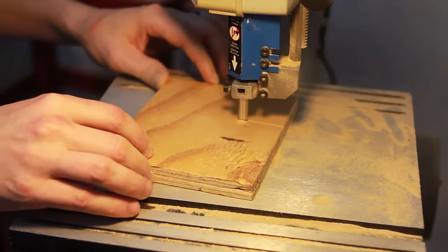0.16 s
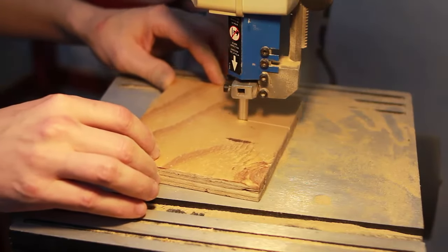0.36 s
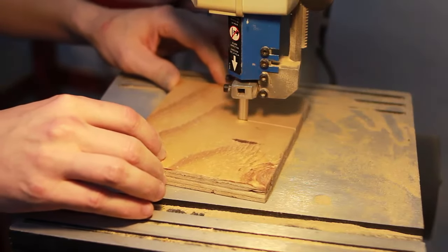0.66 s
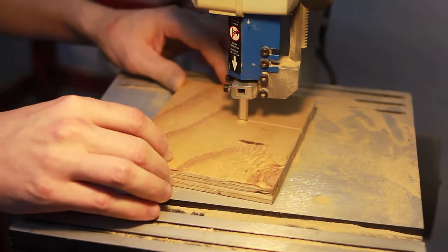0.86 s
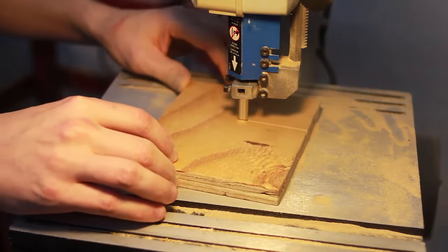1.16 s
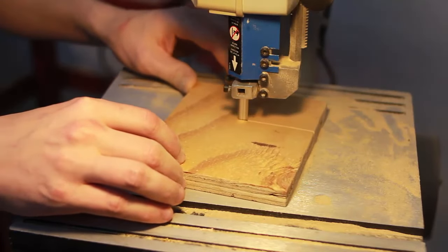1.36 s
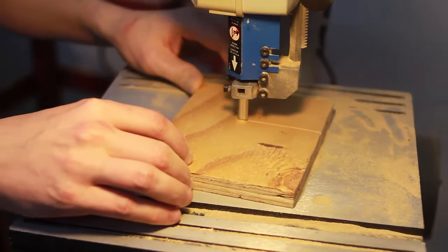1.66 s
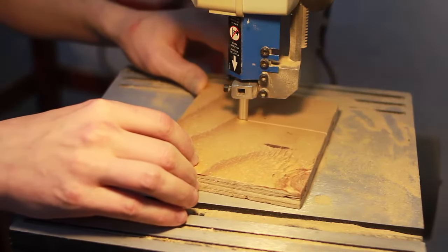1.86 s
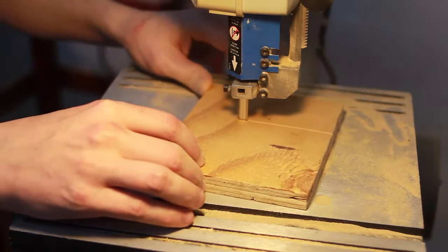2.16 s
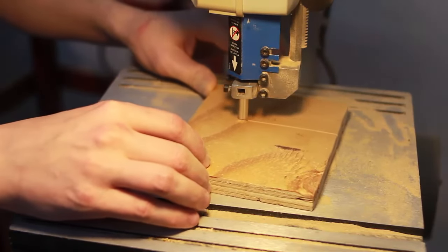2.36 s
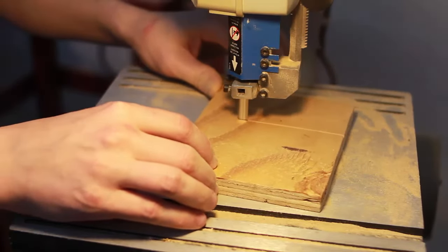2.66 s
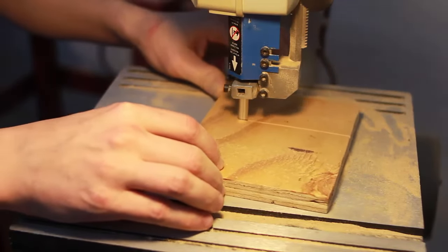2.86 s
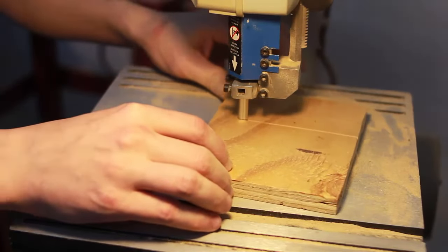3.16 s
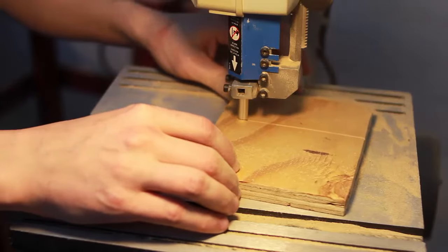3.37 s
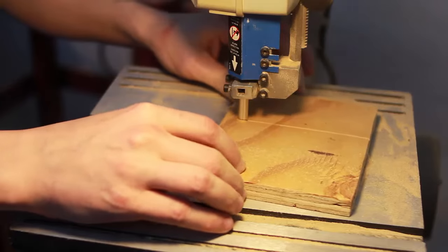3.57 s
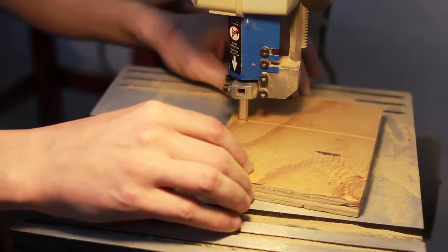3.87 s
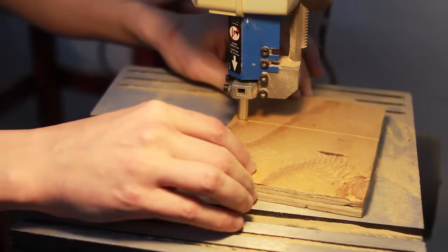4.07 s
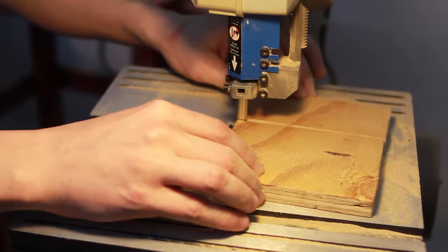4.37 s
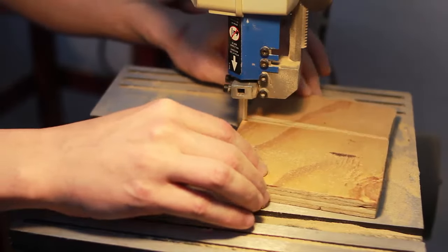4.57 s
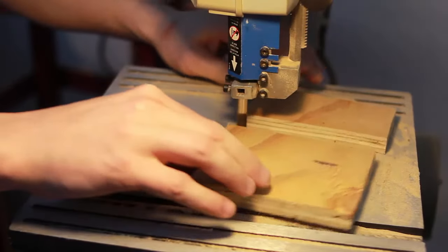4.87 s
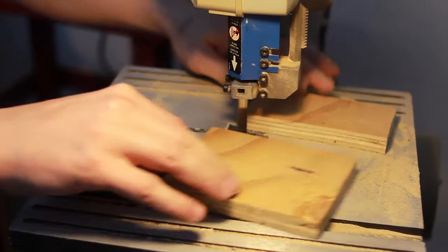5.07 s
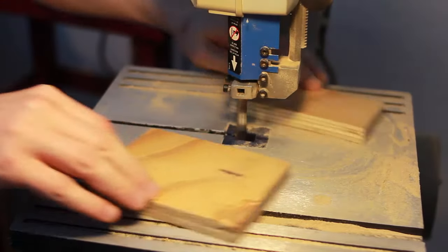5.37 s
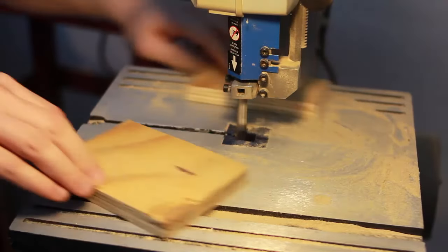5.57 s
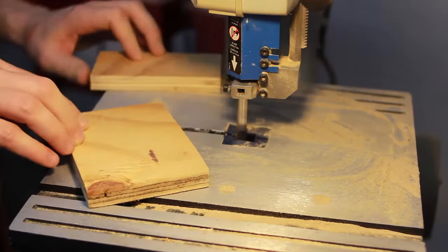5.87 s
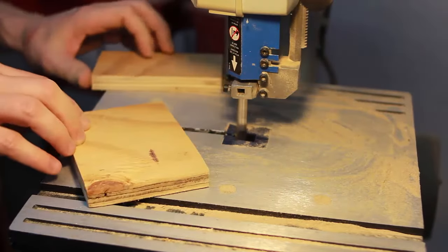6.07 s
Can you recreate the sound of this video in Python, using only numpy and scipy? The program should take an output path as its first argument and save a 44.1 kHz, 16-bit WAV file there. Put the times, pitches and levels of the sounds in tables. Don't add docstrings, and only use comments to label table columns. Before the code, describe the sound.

Continuous harsh sawing, high metallic tooth whine mixed with gritty wood noise and a rapid pulsing tick, wavers with hand pressure and small chattering chirps. The blade then leaves the wood at once; a short run of dull rapid knocks follows as the halves part, and the running wheels and belt rise into a steady hollow drone. Close microphone, short room tail.

```python
import sys
import numpy as np
from scipy import signal
from scipy.fft import rfft, irfft, next_fast_len
from scipy.io import wavfile
from scipy.ndimage import uniform_filter1d, minimum_filter1d

SR = 44100
rng = np.random.default_rng(int(sys.argv[2]) if len(sys.argv) > 2 else 0)


def materialize(psi):
    bounded = np.clip(np.atleast_2d(psi).T, -1, 1)
    quanta = np.round(bounded * 32767).astype(np.int16)
    wavfile.write(sys.argv[1], SR, quanta)


def gain_from_decibels(decibels):
    exponent = np.asarray(decibels, float) / 20
    return 10 ** exponent


N = 274302

LOOP_HZ, WHEEL_HZ, TOOTH_HZ = 9.747, 19.52, 1748.5
EXIT_S = 4.426
COMMON_MEAN_DB = -33.5

WEAK_MULTIPLES = [5, 7, 8, 4 / 3, 8 / 3, 14 / 3]
WEAK_LINE_DB = [-14.5, -43, -27, -11, -11.5, -12]
# [t/s, level/dB, gain/dB]
COMMON_LEVEL = [(0, -34, 2.5), (.2, -33.5, 2.5), (.85, -35, 0), (1.15, -34.5, 4), (1.4, -33, 2),
                (1.9, -37.5, 1), (2.1, -36, -1.5), (2.21, -37.5, -0.5), (2.4, -35, 1.5), (2.6, -36.5, -1),
                (2.73, -36, 3), (2.97, -40.5, 0.5), (3.2, -35.5, 3.5), (3.45, -36, -2), (3.66, -33.5, 0.5),
                (3.85, -36, -2), (4.15, -35.5, 1.5), (4.36, -32.5, 3.5)]
# [t/s, depth]
BITE_DEPTH = [(0, 0.73), (.8, 0.82), (1.5, 0.81), (2.2, 1.28), (3, 1.34), (3.6, 1.06), (4.4, 0.73)]
# [position/ms, lift/dB, half length/ms]
PROUD_STRETCHES = [
    (12, 6, 8.1),
    (26.2, -0.5, 2.3),
    (38.2, 6, 4.7),
    (52.7, 7, 3.3),
    (75.8, 8.5, 9.1),
    (89.9, 7, 4.7),
    (100.3, 13, 1.18),
]
# [t/s, peak level/dB, half length/s]
RINGS_FIRST = [(.15, -40, 0.074), (.6, -37, 0.14), (.95, -40, 0.13), (1.4, -41, 0.055), (1.7, -42, .15),
               (2.45, -39, 0.19), (2.8, -38, 0.23), (3.2, -38, 0.22), (3.7, -35, 0.19), (4.0, -34.5, 0.16),
               (4.36, -41, 0.18)]
RINGS_SECOND = [(.05, -28, 0.34), (.75, -35.5, .2), (1.08, -31, 0.24), (1.4, -31, 0.22),
                (1.82, -26.5, 0.35), (2.75, -30, 0.22), (3.2, -34, 0.34), (3.68, -36.5, .08)]
RINGS_THIRD = [(.62, -31.5, .2), (1.3, -43, .1), (1.8, -42, .08), (2.72, -37, 0.19), (3.13, -44, 0.051),
               (4.28, -37, 0.065)]
RINGS_FOURTH = [(.55, -39, 0.12), (1.45, -33.5, 0.26), (1.75, -26, 0.22), (2.05, -33, 0.28),
                (2.45, -28, 0.15), (2.85, -26.5, 0.18), (3.25, -26.5, 0.24), (3.6, -34.5, .15),
                (3.98, -28, 0.19), (4.3, -33, 0.13)]
RINGS_SIXTH = [(1.05, -34, 0.43), (2.8, -43, .12), (3.15, -35.5, 0.31), (3.65, -33, 0.1), (3.95, -39, 0.15),
               (4.3, -29, 0.11)]
BETWEEN_RINGS_DB = [-48, -69, -46.5, -42.5, -55.5]
# [t/s, lift/dB, half length/s]
SET_SWELLS = [(.9, 1, 0.27), (2.35, 2.5, 0.12), (2.9, -4, .25), (3.6, 1, 0.37), (4.25, 5, .25)]
# [t/s, lift/dB, half length/s]
BOARD_SWELLS = [(.85, -0.5, 0.13), (3.68, -4.5, 0.087), (3.95, -6, 0.098)]
# [f/Hz, level/dB per Hz]
CHIP_SPECTRUM = [(180, -46), (300, -2.5), (398, -10.5), (1150, -6), (1580, -4), (1720, -3), (3030, -2.5),
                 (3400, 1.5), (4990, -5.5), (6960, -3), (8790, -14.5), (10700, -11.5), (16000, -15.5)]
# [f/Hz, width/Hz, lift/dB]
BOARD_MODES = [(1133, 42, 7.5), (1420, 780, -4), (1660, 110, 0), (2050, 460, 4.5), (2300, 71, -1.5),
               (2810, 65, 3.5), (4593, 105, 11), (5400, 450, 4.5), (9300, 200, 4.5), (12800, 200, 2),
               (13900, 270, 1), (15200, 600, 1)]
# [f/Hz, level/dB per Hz]
RUMBLE_SPECTRUM = [(18, -69), (30, -39), (49, -32), (245, -5.5), (295, -8), (394, 2.5), (486, 0.5),
                   (526, 3.5), (1630, -7.5), (2410, -9), (2680, -8), (2980, -10), (5450, -16.5),
                   (7670, -22.5), (16000, -27.5)]
# [f/Hz, width/Hz, lift/dB]
FRAME_MODES = [(197, 49, 2), (258, 62, 7), (408, 130, 3.5), (487, 40, 9), (435, 15, 0.5), (507, 27, -6),
               (640, 81, 4), (820, 30, 4), (1090, 210, 1.5), (4320, 180, 5.5), (5530, 49, 9.5),
               (6820, 300, 6), (11700, 80, 9), (13100, 400, 7), (14200, 90, 6), (15100, 400, 6)]
# [f/Hz, width/Hz, lift/dB]
GUIDE_MODES = [(2150, 35, 9), (2233, 25, 10), (2315, 25, 7), (2431, 15, 7), (2600, 90, 6), (2695, 80, 11),
               (2765, 30, 9)]
# [f/Hz, level/dB]
WHEEL_HARMONICS = [(107.7, -71), (134.6, -75), (156.1, -58), (193.8, -51.5), (215.3, -56.5), (253.0, -52.5),
                   (349.9, -43), (409.1, -33.5), (468.3, -40), (489.9, -37.5), (565.2, -41), (624.5, -42),
                   (646.0, -38.5), (759.0, -43), (839.8, -43), (1012, -43), (1308, -45.5)]
UNDER_LOAD_DB = [0.1, 3, -5]
# [t/s, f/Hz, peak
# level/dB, length/ms]
BOARD_CHATTER = [(.385, 2020, -27, 14), (.445, 2050, -31, 14), (.67, 2300, -34, 14), (.765, 2284, -25, 39),
                 (.98, 2035, -27, 20), (1.015, 2020, -29, 20), (1.095, 2310, -28, 18),
                 (1.79, 2300, -25, 17), (1.82, 2300, -28, 22), (2.525, 2320, -28, 15),
                 (2.548, 2310, -31, 13), (2.725, 2300, -25, 10), (2.755, 2320, -29, 19),
                 (3.645, 2090, -24, 10), (3.69, 1970, -24, 20), (3.76, 2290, -29.5, 60),
                 (4.285, 2280, -23, 14), (4.39, 1750, -34, 40), (4.398, 3450, -27, 34),
                 (4.4, 2400, -36, 24), (4.465, 3450, -37.5, 80), (5.745, 640, -24, 47)]
# [t/s, peak level/dB, half length/s]
BLADE_BRUSHES = [
    (4.59, 1.5, 0.031),
    (5.36, -7, 0.082),
    (6.12, -7, 0.072),
]


def curve(table):
    s, *columns = np.transpose(table)
    return [np.interp(np.arange(N) / SR, s, c) for c in columns]


def walk(rate):
    k = int(SR / rate)
    steps = np.repeat(rng.standard_normal(N // k + 1), k)
    w = uniform_filter1d(uniform_filter1d(steps, k), k)[:N]
    return w / w.std()


def repeating(hz, keep, share):
    size = int(round(SR / hz))
    fresh = rng.standard_normal((N // size + 30, size))
    turns = signal.lfilter([np.sqrt(1 - keep ** 2)], [1, -keep], fresh, axis=0)
    return np.sqrt(share) * turns.ravel()[-N:] + np.sqrt(1 - share) * rng.standard_normal(N)


def colour(x, spectrum, modes, lo_hz, hi_hz, ref_hz):
    size = next_fast_len(N)
    f = np.maximum(np.fft.rfftfreq(size, 1 / SR), 1)
    hz, level_db = np.transpose(spectrum)
    db = np.interp(np.log(f), np.log(hz), level_db)
    for centre, width, lift in modes:
        db = db + lift / (1 + (2 * (f - centre) / width) ** 2)
    edges = np.sqrt((1 + (lo_hz / f) ** 6) * (1 + (f / hi_hz) ** 6))
    bins = rfft(x, size) * gain_from_decibels(db) / edges
    inside = (f > ref_hz[0]) & (f < ref_hz[1])
    return irfft(bins, size)[:N] * size / np.sqrt(2 * np.sum(np.abs(bins[inside]) ** 2))


def swells(table, floor_db):
    t = np.arange(0, N / SR + .01, .005)
    power = 0
    for s, db, half in table:
        power = power + gain_from_decibels(np.maximum(2 * db - 12 * ((t - s) / half) ** 2, -300))
    return 10 * np.log10(gain_from_decibels(2 * floor_db) + np.interp(np.arange(N) / SR, t, power))


def noise_levels():
    db = curve(COMMON_LEVEL)[0]
    fresh_kerf_db = 4.5 * np.exp(-np.arange(N) / SR / 3)
    return db + 2.5 + swells(BOARD_SWELLS, 0), db + 0.3, db - 5 + fresh_kerf_db


def bite(loop_ms):
    period, rise = 1000 / LOOP_HZ, .5
    db = -3.5
    for ms, lift, half in PROUD_STRETCHES:
        off = ((loop_ms - ms + period / 2) % period - period / 2) / half
        db = db + lift * np.exp(-(off / np.where(off < 0, rise, 2 - rise)) ** 2)
    return db


def whine(rings, order):
    return swells(rings, BETWEEN_RINGS_DB[order]) + 0.35 * (curve(COMMON_LEVEL)[0] - COMMON_MEAN_DB)


def stroke(phase, multiple, db, flutter_db):
    angle = multiple * phase + 0.17 * multiple * walk(60) + rng.uniform(0, 2 * np.pi)
    return gain_from_decibels(db + flutter_db * walk(120)) * np.sin(angle)


def teeth(loop_ms, bite_db):
    board_db = noise_levels()[0]
    phase = 2 * np.pi * TOOTH_HZ * np.arange(N) / SR
    phase = phase + .9 * walk(6) + .25 * walk(40) + .12 * walk(200)
    lean_db = 8.5 * np.tanh(2.5 * np.cos(2 * np.pi * (loop_ms - 66) * LOOP_HZ / 1000))
    levels_db = [
        whine(RINGS_FIRST, 0) - .3 + lean_db,
        whine(RINGS_SECOND, 1) + 1.7 + 1.06 * bite_db,
        whine(RINGS_THIRD, 2) + 2.1 + 0.51 * bite_db,
        whine(RINGS_FOURTH, 3) + 1.5 + 0.27 * bite_db,
        whine(RINGS_SIXTH, 4) + 0.21 + 0.5 * bite_db,
    ]
    for db in WEAK_LINE_DB:
        levels_db.append(board_db + db + 0.93 * walk(3.63) + 0.86 * bite_db)
    levels_db[-2] = levels_db[-2] + swells(SET_SWELLS, -1.5)
    out = np.zeros(N)
    for multiple, db in zip([1, 2, 3, 4, 6] + list(WEAK_MULTIPLES), levels_db):
        out += stroke(phase, multiple, db, min(.4 + .7 * multiple, 3.2))
    return out


def squeal(bite_db):
    shake = repeating(LOOP_HZ, .6, .3)
    blade_modes = [(6970, 1070, 24), (7620, 1040, 18)]  # f/Hz, width/Hz, lift/dB
    ring = colour(shake, CHIP_SPECTRUM, blade_modes, 6200, 8000, (6500, 7500))
    return gain_from_decibels(whine(RINGS_FOURTH, 3) - 7.0 + 1.65 * bite_db + 0.96 * walk(130)) * ring


def chips(bite_db):
    board_db, blade_db, hiss_db = noise_levels()
    tear_db = 0.51 * walk(150) + 1.1 * walk(30.37)
    board_noise, blade_noise = repeating(LOOP_HZ, 0.58, 0.59), repeating(LOOP_HZ, 0.093, 0.15)
    board = colour(board_noise, CHIP_SPECTRUM, BOARD_MODES, 464, 3320, (1850, 3300))
    blade = colour(blade_noise, CHIP_SPECTRUM, BOARD_MODES, 4000, 7500, (3700, 5100))
    hiss = colour(rng.standard_normal(N), CHIP_SPECTRUM, BOARD_MODES, 8100, 30000, (11000, 15500))
    board = board * gain_from_decibels(board_db - 0.5 + 0.12 * bite_db + 0.73 * tear_db)
    blade = blade * gain_from_decibels(blade_db - 4.5 + 0.28 * bite_db + tear_db)
    hiss = hiss * gain_from_decibels(hiss_db + 0.2 + 0.55 * bite_db + tear_db)
    return board + blade + hiss


def workshop(cut):
    size = SR // 4
    tail = rng.standard_normal(size) * np.exp(-np.arange(size) / (0.071 * SR))
    tail = signal.lfilter([.3], [1, -.7], tail)
    return gain_from_decibels(-11.5) * signal.fftconvolve(cut, tail / np.sqrt(np.sum(tail ** 2)))[:N]


def idle():
    (common_db, gain_db), t = curve(COMMON_LEVEL), np.arange(N) / SR
    since = np.maximum(t - 4.475, 0)
    lifted = np.minimum(-41 + 33 * since, -28 - 0.63 * since)
    held = -43.5 + 0.48 * (common_db - COMMON_MEAN_DB) + gain_db
    rumble = uniform_filter1d(np.where(t < EXIT_S, held, lifted), size=2000)
    load = np.exp(-np.maximum(t - EXIT_S, 0) / 0.034)
    free_db = (-0.3, 0.5, -5.5)
    knock, ring, hiss = (free + (busy - free) * load for busy, free in zip(UNDER_LOAD_DB, free_db))
    pinch = -1 * (1 - load) * np.exp(-((t - EXIT_S) / 0.37) ** 2)
    return rumble, knock, ring + pinch, swells(BLADE_BRUSHES, hiss + pinch)


def wheel_hum():
    t = np.arange(N) / SR
    hum = np.zeros(N)
    for hz, db in WHEEL_HARMONICS:
        exact_hz = WHEEL_HZ * np.round(hz / WHEEL_HZ) * (1 - 2e-4)
        angle = 2 * np.pi * exact_hz * t + 0.24 * walk(3.12) + rng.uniform(0, 2 * np.pi)
        hum += gain_from_decibels(db + 30.5 + 0.67 * walk(2.6)) * np.sin(angle)
    return hum


def guides(ring_db, hiss_db):
    t = np.arange(N) / SR
    wobble_db = 0.69 * np.cos(2 * np.pi * WHEEL_HZ * t + 2.0) + .8 * walk(12) + 0.81 * walk(120)
    rub = repeating(LOOP_HZ, .98, 0.21)
    free = np.interp(t, [4.3, 4.43, 4.62, 4.95], [1.0, 0.11, 0.65, 1.0])
    free_modes = list(FRAME_MODES) + list(GUIDE_MODES)
    free_ring = colour(rub, RUMBLE_SPECTRUM, free_modes, 1460, 6200, (1500, 5000))
    damped_ring = gain_from_decibels(1.5) * colour(rub, RUMBLE_SPECTRUM, FRAME_MODES, 1460, 4500, (1500, 5000))
    ring = free * free_ring + (1 - free) * damped_ring
    hiss = colour(rng.standard_normal(N), RUMBLE_SPECTRUM, FRAME_MODES, 4320, 30000, (5000, 16000))
    return gain_from_decibels(ring_db + wobble_db + 0.26) * ring + gain_from_decibels(hiss_db + wobble_db - 1.74) * hiss


def machine():
    rumble_db, knock_db, ring_db, hiss_db = idle()
    t = np.arange(N) / SR
    drone_noise, knock_noise = repeating(WHEEL_HZ, 0.91, 0.53), repeating(WHEEL_HZ, 0.64, 0.26)
    drone = gain_from_decibels(-4.5) * colour(drone_noise, RUMBLE_SPECTRUM, FRAME_MODES, 133, 740, (330, 680))
    knock = colour(knock_noise, RUMBLE_SPECTRUM, FRAME_MODES, 820, 1800, (700, 1400))
    turn_db = 0.69 * np.cos(2 * np.pi * WHEEL_HZ * t + .15)
    knock = knock * gain_from_decibels(knock_db - 2.0 + turn_db + 1.6 * walk(60))
    thrum_spectrum = [(30, -22), (75, -14), (120, 2), (200, -4)]  # f/Hz, level/dB per Hz
    thrum = colour(rng.standard_normal(N), thrum_spectrum, [], 20, 220, (30, 200))
    thrum = thrum * gain_from_decibels(2.4 * (rumble_db + 28.5) - 58.5)
    return thrum + gain_from_decibels(rumble_db) * (drone + wheel_hum() + knock + guides(ring_db, hiss_db))


def bursts(table):
    out = np.zeros(N)
    for s, hz, db, ms in table:
        size = int(ms * SR / 600)
        start = int(s * SR) - size // 2
        tone = np.sin(2 * np.pi * hz * np.arange(size) / SR + rng.uniform(0, 2 * np.pi))
        out[start:start + size] += gain_from_decibels(db) * np.hanning(size) * tone
    return out


def chatter():
    return bursts(BOARD_CHATTER)


def slaps():
    events = []
    for turn in range(14):
        s = 4.61 + turn / WHEEL_HZ
        db = -20.5 - 4 * ((s - 4.94) / .26) ** 2
        hz, side_db = (728, -2.5) if turn % 2 else (800, 0)
        events.append((s, hz, db + side_db, 12))
    return bursts(events)


def scene():
    t = np.arange(N) / SR
    loop_ms = 1000 * (t % (1 / LOOP_HZ))
    bite_db = bite(loop_ms) * curve(BITE_DEPTH)[0] * (1 + 0.1 * walk(8.5))
    cutting = np.exp(-np.maximum(t - EXIT_S, 0) / 0.0046)
    cut = cutting * (teeth(loop_ms, bite_db) + squeal(bite_db) + chips(bite_db))
    return (cut + workshop(cut) + machine() + chatter() + slaps())[None]


def top_cut(x):
    return signal.sosfilt(signal.butter(12, 16540, fs=SR, output="sos"), x)


def record(dry):
    ceiling, top_hz, bass_hz = .39, 15740, 45
    size = next_fast_len(N)
    f = np.fft.rfftfreq(size, 1 / SR)
    band = (f < top_hz) * (f / bass_hz) ** 2 / np.sqrt(1 + (f / bass_hz) ** 4)
    gain = np.minimum(ceiling / (np.abs(dry) + 1e-9), 1)
    gain = uniform_filter1d(minimum_filter1d(gain, size=180), size=180)
    mix = irfft(rfft(dry * gain, size) * band, size)[:, :N]
    return top_cut(mix)


dry = scene()
out = record(dry)
materialize(out)
```